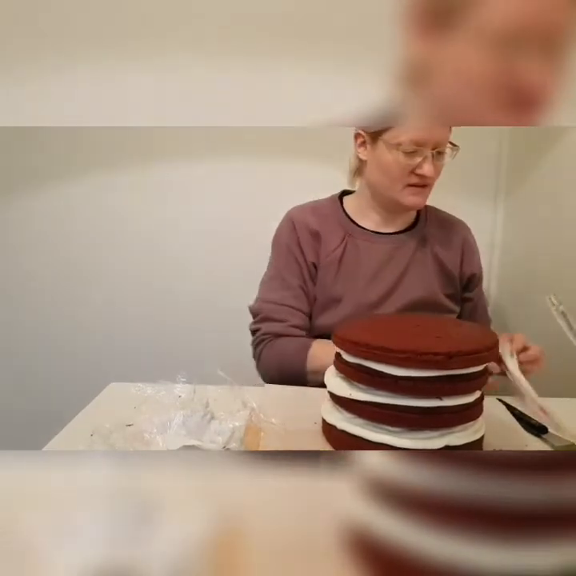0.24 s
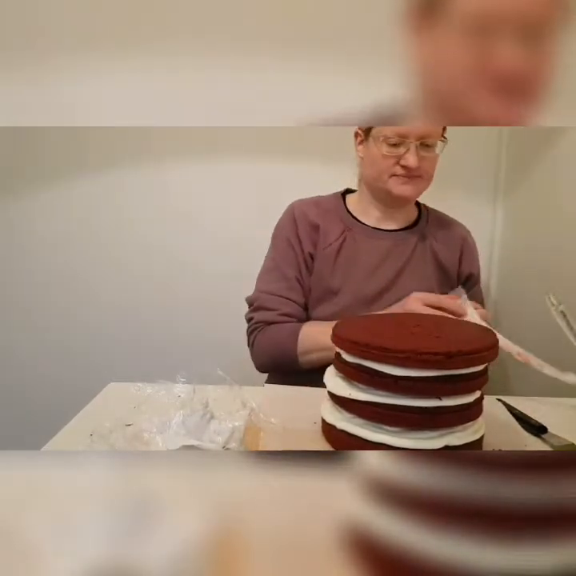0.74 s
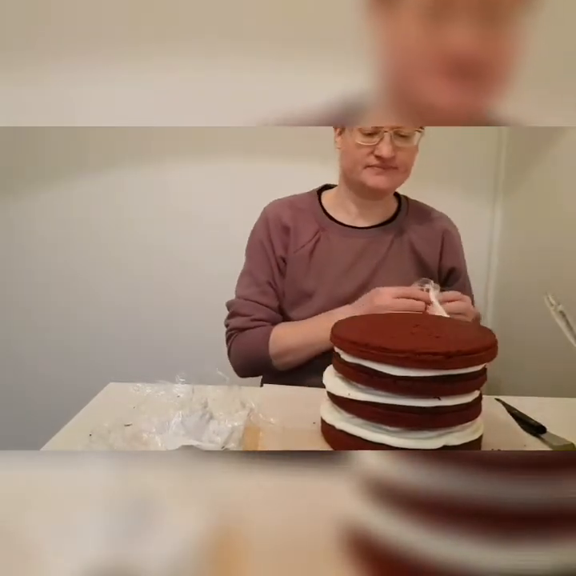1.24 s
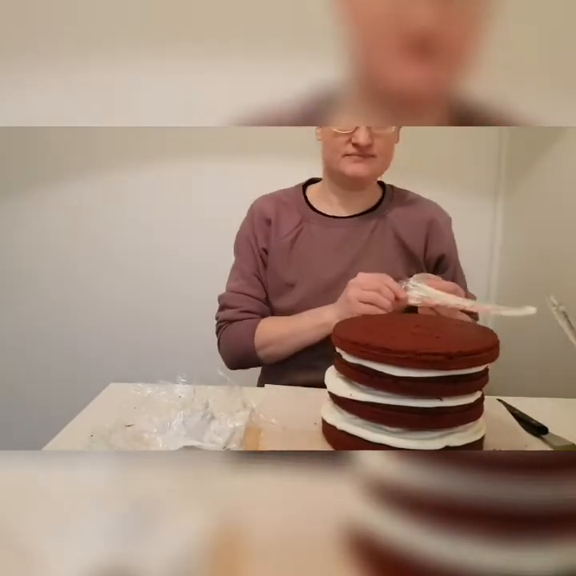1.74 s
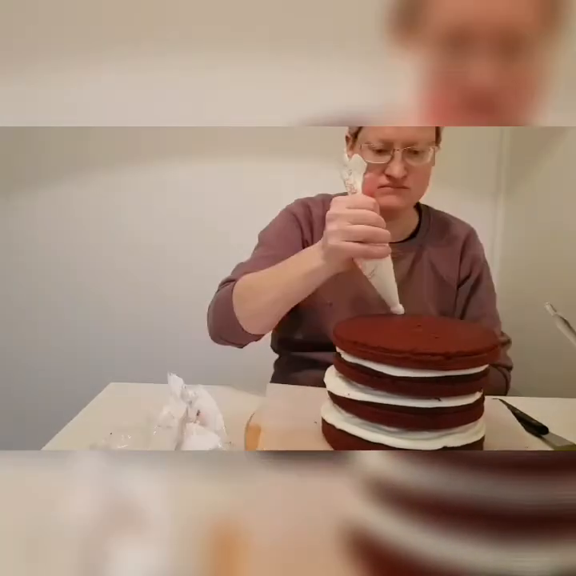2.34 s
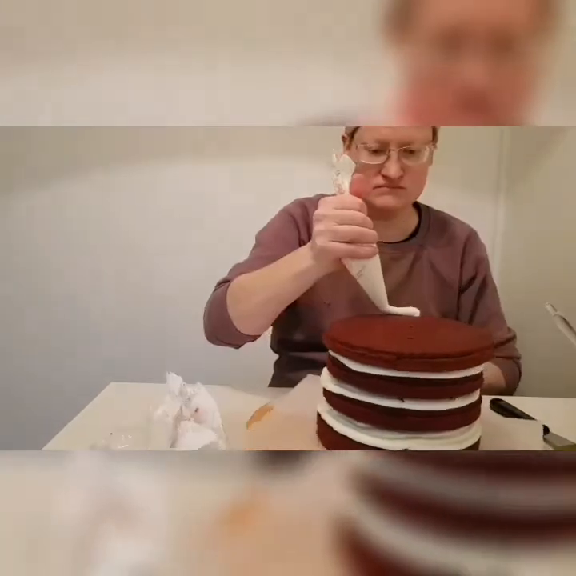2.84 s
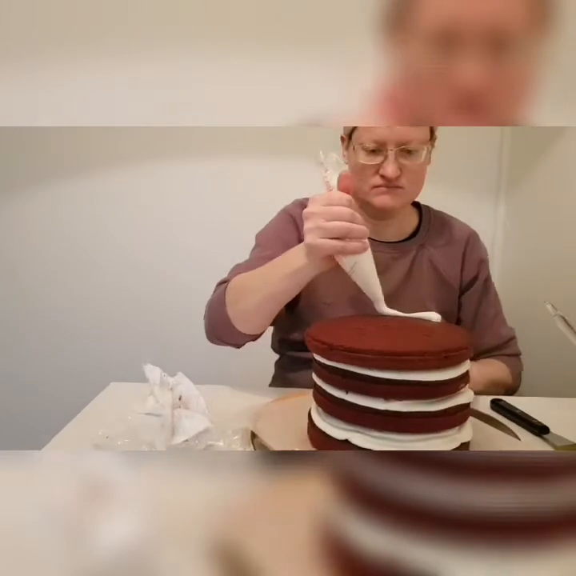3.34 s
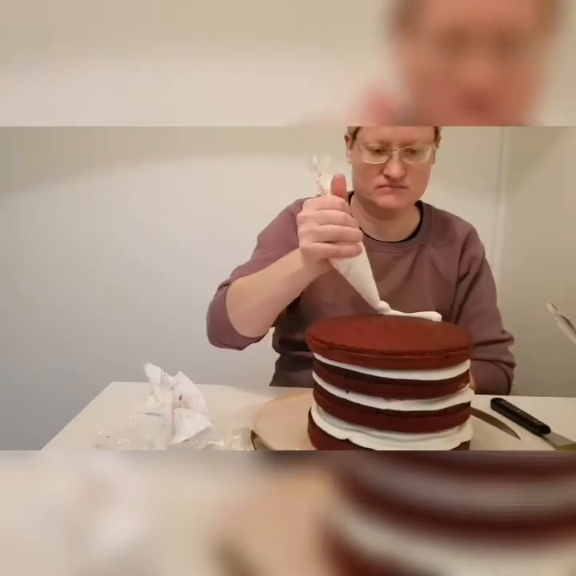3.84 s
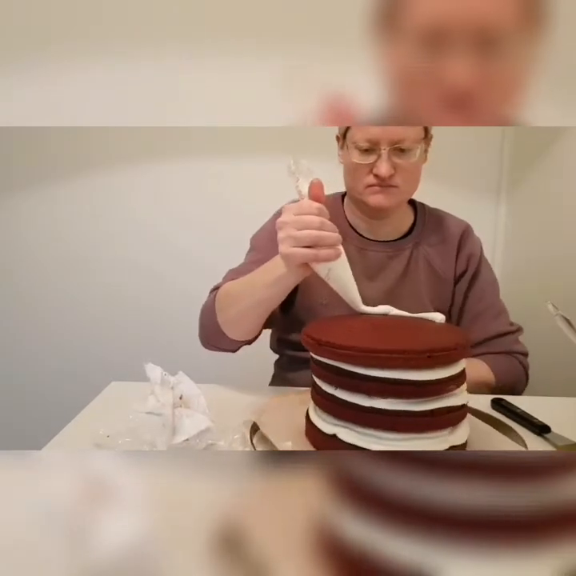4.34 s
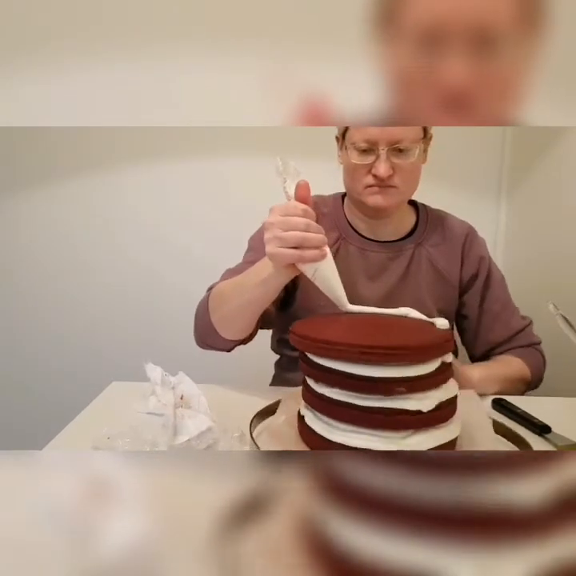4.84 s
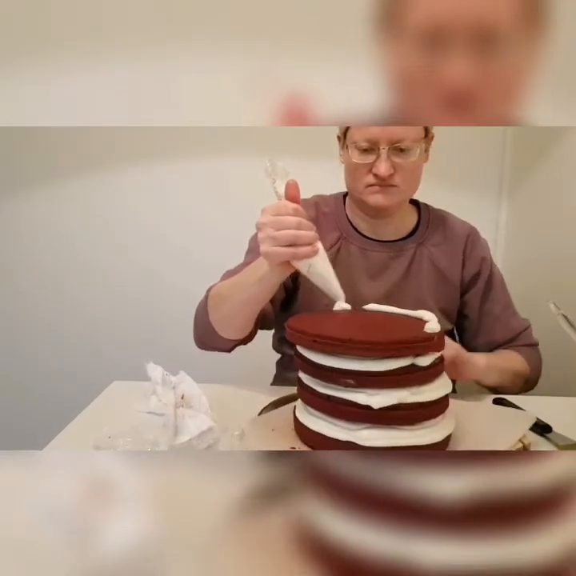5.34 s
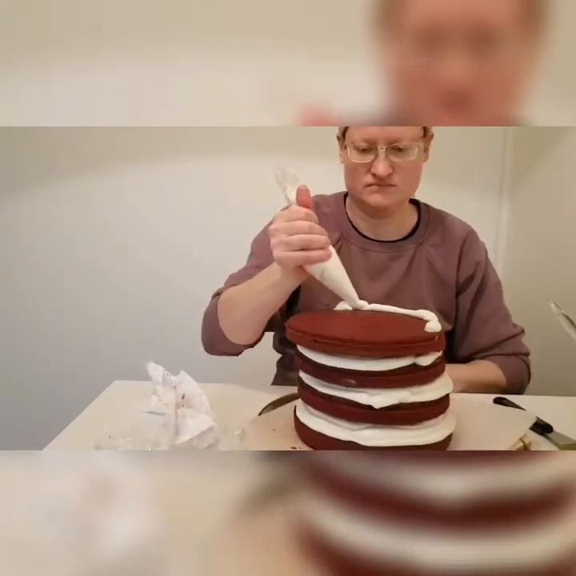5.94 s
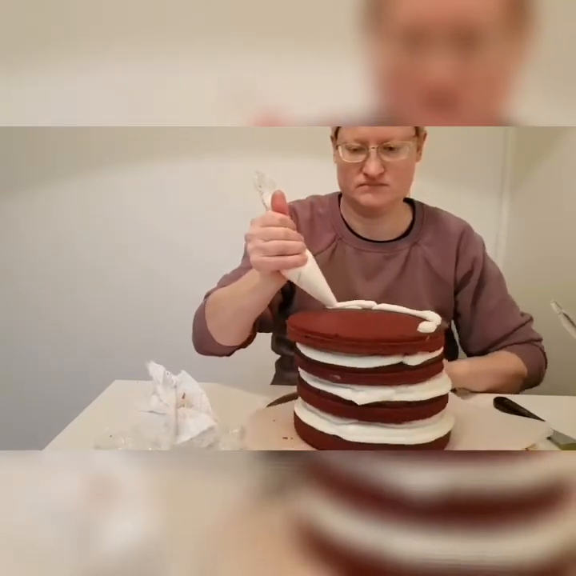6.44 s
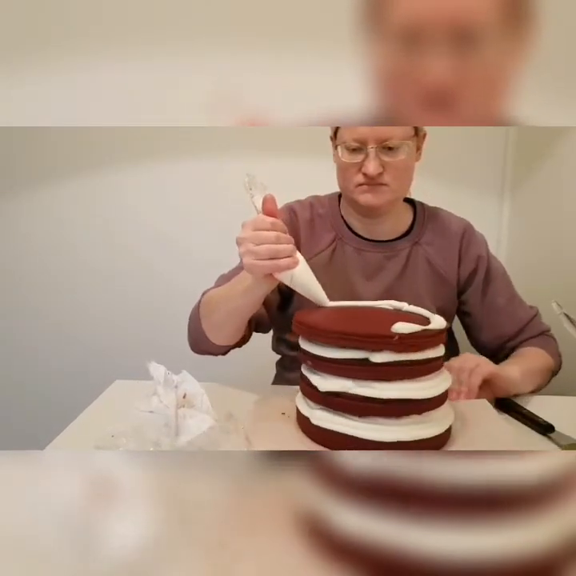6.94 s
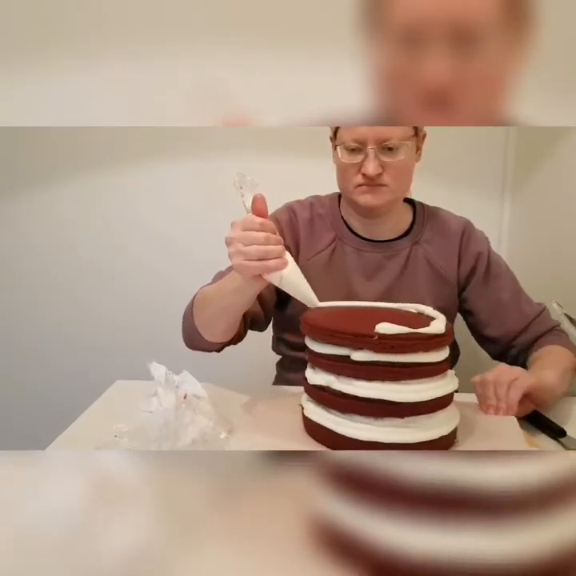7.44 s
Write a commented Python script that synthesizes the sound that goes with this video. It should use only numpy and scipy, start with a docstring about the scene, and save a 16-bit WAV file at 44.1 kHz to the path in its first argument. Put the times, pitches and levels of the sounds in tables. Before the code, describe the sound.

Busy plastic bag crumpling in a bare kitchen swells, cuts off abruptly, then gentle squeezing ticks, sliding scuffs and isolated bright snaps over low hum.

```python
"""A plastic piping bag is twisted and crumpled in a bare kitchen: random micro-clicks, snaps and folds.
After a cut it is squeezed gently in quieter ticks of uneven size, with sharp snaps and squelches of icing.
The cake's board slides on the table: click-excited friction bands; bumps are brief damped knocks.
Decaying noise echoes and standing waves make the room, over a swelling hum, rumble, whine and hiss."""
import sys
import numpy as np
from scipy import signal
from scipy.fft import rfft, irfft, next_fast_len
from scipy.io import wavfile
from scipy.ndimage import uniform_filter1d, map_coordinates

SR = 44100
rng = np.random.default_rng(int(sys.argv[2]) if len(sys.argv) > 2 else 0)


def unload_audio(sound):
    """Save the sound as a 16-bit wav file, at the path given as the first command line argument."""
    columns = np.transpose(np.atleast_2d(sound))
    # keep every value between -1 and 1, then stretch to whole-number steps
    steps = np.round(np.clip(columns, -1, 1) * 32767)
    wavfile.write(sys.argv[1], SR, steps.astype(np.int16))


N = 338864


# All dB columns are relative: layer gains and filters follow.
# Twists of the slack bag. Each row: start in seconds, length in seconds, crackle in dB, flexing sheet in dB.
TWISTS = [(0.035, 0.11, -53.5, -60), (0.075, 0.04, -60, -54), (0.115, 0.074, -46, -57.5),
          (0.22, 0.1, -73, -66.5), (0.41, 0.18, -50.5, -59.5), (0.7, 0.042, -46, -61.5),
          (0.76, 0.34, -49, -54.5), (0.97, 0.069, -43.5, -50.5), (1.09, 0.14, -64, -51),
          (1.39, 0.058, -47.5, -55.5), (1.59, 0.11, -45.5, -53), (1.68, 0.16, -44, -48.5),
          (1.9, 0.094, -52, -57), (2.03, 0.074, -69, -53.5), (2.1, 0.51, -41.5, -44.5),
          (2.38, 0.12, -39.5, -48), (2.47, 0.21, -35.5, -45), (2.56, 0.12, -35.5, -45)]
TWIST_ATTACK_S, TWIST_SAG_DB_PER_S, TWIST_RELEASE_S = 0.053, 5, 0.097
# Ring of the sheet's largest facet. Each row: time in seconds, pitch in Hz.
FACET = [(0.1, 1730), (0.19, 2240), (0.8, 2350), (0.98, 1690), (1.1, 2200), (1.13, 1880), (1.5, 2550),
         (1.68, 2060), (2.4, 2150), (2.44, 1920), (2.62, 2470), (2.66, 2190)]
# Colour of the crackling film. Each row: frequency in Hz, density in dB per Hz.
FILM = [(1200, -62), (2500, -5.5), (4000, 3), (7000, 6), (11000, 1.5), (16000, -2)]
# Colour of the flexing sheet. Each row: frequency in Hz, density in dB per Hz.
SHEET = [(120, -45), (300, -4), (600, 0.5), (1100, -4), (1900, 0), (2800, -0.5), (4500, -14), (9000, -11.5)]


def crumpling(crowding=0.8, sparsest=0.24):
    """Twisting sets off ticks, crowded when hard; the sheet flexes, a facet rings, hands jostle the table."""
    crackling, flexing = film_and_sheet(TWISTS, TWIST_ATTACK_S, TWIST_SAG_DB_PER_S, TWIST_RELEASE_S)
    facet_hz, = curves(FACET)
    density = np.maximum((crackling / crackling.max()) ** crowding, sparsest)
    ticks = crackle(rate_hz=1400 * density, spread_db=1.5, life_s=0.00056, clump_db=6.5)
    clicks = patchy(ticks / np.sqrt(density), depth_db=2.5)  # density leaves the loudness alone
    film = coloured(clicks, FILM)
    sheet = coloured(clicks, SHEET) + amp(-13.5) * gliding(clicks, facet_hz, half_width_hz=160)
    jostle = amp(-14.5) * resonant(noise(), [(51.3, 69, -2), (76, 12, -1)])
    return amp(-9.5) * crackling * film + amp(-5.0) * flexing * (sheet + jostle)


# Squeezes of the taut bag. Each row: start in seconds, length in seconds, crackle in dB, flexing sheet in dB.
SQUEEZES = [(2.64, 0.53, -73, -78.5), (2.81, 0.098, -64, -87), (2.88, 0.089, -57, -64),
            (2.98, 0.36, -65, -69), (3.1, 0.13, -60, -59.5), (3.7, 0.11, -64, -72),
            (3.745, 0.11, -51.5, -57), (3.88, 0.069, -56, -58), (3.955, 0.066, -50.5, -52.5),
            (4.02, 0.014, -47.5, -50.5), (4.2, 0.27, -68.5, -67.5), (4.41, 0.2, -62, -66),
            (4.62, 0.34, -60.5, -58.5), (4.97, 0.41, -84, -56), (6.03, 0.066, -56, -64.5),
            (6.08, 0.051, -60, -53.5), (6.19, 0.14, -65, -54), (6.45, 0.9, -63.5, -74.5),
            (6.76, 0.25, -55, -85), (6.95, 0.17, -74, -59), (7.3, 0.7, -64.5, -86)]
SQUEEZE_ATTACK_S, SQUEEZE_SAG_DB_PER_S, SQUEEZE_RELEASE_S = 0.032, 0.5, 0.044
# Dull colour of a pushed crease. Each row: frequency in Hz, density in dB per Hz.
CREASE = [(200, -12), (500, 1), (1000, 0.5), (1600, 3), (2200, 1), (3200, 0), (6000, -6.5)]


def squeezing():
    """The taut bag gives quiet, loose ticks of uneven size in the fist."""
    crackling, flexing = film_and_sheet(SQUEEZES, SQUEEZE_ATTACK_S, SQUEEZE_SAG_DB_PER_S, SQUEEZE_RELEASE_S)
    ticks = crackle(rate_hz=830, spread_db=3.5, life_s=0.0014, clump_db=5.5)
    film = amp(-11.0) * crackling * coloured(ticks, FILM)
    sheet = amp(-7.5) * flexing * coloured(ticks, CREASE)
    return film + sheet


# Single creases flipping. Each row: start in seconds, level in dB, body in dB re level, centre in Hz,
# bell width in octaves, rise in seconds.
SNAPS = [(0.0563, -56, 1, 8020, 1.7, 0.0011), (0.0658, -54, -14, 7000, 1.2, .001),
         (0.0783, -53, -12, 7000, 1.2, 0.0009), (0.1182, -35.5, 0.5, 6600, 1.4, 0.0024),
         (0.2666, -30, -17, 4500, 1.9, 0.0017), (0.4042, -26.5, -40, 12700, 0.96, 0.0017),
         (0.4469, -34, -21, 8000, 1.1, 0.00064), (0.462, -41, -12, 8000, 1, 0.00082),
         (0.5567, -33.5, -25, 5960, 1.5, .0005), (0.6405, -41, -24, 8000, 1, 0.00055),
         (0.7749, -29.5, -15, 10700, 1.8, 0.0015), (0.7865, -31, -26, 4560, 0.61, 0.0008),
         (0.8465, -27, -14, 8000, 1, 0.0012), (0.9385, -35, -29, 6470, 0.43, 0.0013),
         (0.966, -35, -26, 6500, .6, .001), (0.975, -24.5, -24, 9000, 0.98, 0.0009),
         (1.0865, -26.5, -22, 6800, 0.76, 0.0011), (1.1372, -33.5, -10, 6140, 0.67, 0.00083),
         (1.155, -45, -17, 3500, 0.92, 0.00062), (1.168, -37, -24, 8000, .8, 0.00086),
         (1.1783, -29.5, -23, 6500, 0.8, 0.0011), (1.2227, -33, -24, 9800, 0.73, 0.00052),
         (1.2287, -32.5, -8, 5500, 0.87, 0.00094), (1.2727, -25, -23, 9100, 1.9, 0.0014),
         (1.2992, -28.5, -5.5, 5700, 0.92, 0.0013), (1.3948, -37, -19, 9900, 0.62, 0.00066),
         (1.4077, -27.5, -37, 7700, 0.7, 0.00075), (1.5195, -42, -22, 8000, 1, .0006),
         (1.5927, -30.5, -11, 8300, 0.86, 0.0013), (1.6726, -38, 6, 6940, 1.1, 0.00072),
         (1.6893, -23, -4, 8100, 0.44, 0.0011), (1.7809, -25, -13, 7100, 1.7, 0.00076),
         (1.8014, -26, -8, 6500, 1.8, 0.0013), (1.8364, -23, -12, 6000, 2.6, 0.0011),
         (1.9152, -26.5, -4, 8400, 0.58, 0.0019), (1.9595, -28, -11, 8150, 0.57, .0007),
         (2.0947, -39, -9, 10000, 0.84, .0007), (2.126, -28.5, -1, 11200, 0.6, 0.001),
         (2.1456, -23, -29, 10000, 1, 0.001), (2.2014, -21, -17, 9700, 0.6, .0007),
         (2.2483, -25, -21, 9000, 0.74, 0.0012), (2.3501, -26, -13, 8040, 0.58, 0.0012),
         (2.4219, -35, -20, 9000, 1, 0.00059), (2.4499, -20.5, -11, 8000, 0.62, 0.0019),
         (2.5397, -31, -18, 9000, 1, .0008), (2.9084, -42, -22, 7950, 1, 0.0008),
         (3.1423, -49, -25, 8000, 1.2, .0006), (3.8553, -34, -6.5, 8400, 0.71, 0.00094),
         (4.0635, -41, -18, 11000, 1.4, 0.0011), (4.0887, -31, -26, 5030, 1.4, 0.0009),
         (4.4458, -43, -18, 6030, 0.65, .0007), (4.6259, -38, -20, 12500, 0.78, .0004),
         (4.6283, -36, -25, 13500, 0.38, .0004), (4.6639, -33, -25, 8000, 1.9, 0.00079),
         (4.7796, -27, -38, 9500, 1.6, 0.00059), (5.037, -39, -1, 4950, 1.7, 0.0012),
         (5.1345, -34, -13, 7100, 0.9, 0.00022), (5.1692, -38, -15, 10000, .9, 0.00045),
         (5.2808, -38.5, -1.5, 6130, 0.55, 0.00086), (5.3433, -33, -15, 6030, 0.85, 0.0013),
         (6.0577, -54, -14, 8000, 1.2, .0015), (6.1372, -12.5, -19.5, 12000, 0.9, 0.0013),
         (6.305, -45, -28, 13500, 0.3, .0004), (6.339, -32.5, -25, 11400, 0.95, 0.0006),
         (7.1156, -16.5, -30, 11700, 1.3, 0.0024), (7.4874, -45.5, -24, 11500, 0.26, 0.00045)]


def snaps():
    """A crease flips in a jagged broadband burst that dies within milliseconds."""
    def flip(t, rise_s):
        u = t / rise_s
        shape = u * np.exp(-u)
        phases = np.angle(rfft(shape ** 2 * rng.standard_normal(len(t))))
        click = shape * irfft(np.exp(1j * phases), len(t))
        return click / np.linalg.norm(click)
    return amp(4.5) * bursts(SNAPS, flip, body_db=4.5)


# Whole folds collapsing. Each row: start in seconds, level in dB, body in dB re level, centre in Hz.
FOLDS = [(0.1179, -32.5, -18, 6400), (0.1371, -34.5, -7, 4030), (0.776, -33, -19, 12800),
         (0.848, -35, -12.5, 7900), (0.984, -33, 1.5, 8100), (1.008, -38, -0.5, 9000),
         (1.698, -30.5, 0.5, 8540), (2.1303, -30.5, -32, 11300), (3.82, -44, -16, 7740),
         (4.6624, -45, -5, 6400), (5.045, -56, 0, 3000), (6.087, -42.5, -8, 7800), (6.14, -30, -9.5, 6100),
         (6.2549, -42, -20, 4130), (6.9725, -38.5, -10, 8100), (7.1202, -38, 2, 8700)]


def folds(life_s=0.014, ragged_db=4, octaves=0.88):
    """A fold gives way crease after crease, so its decay is ragged."""
    def run(t):
        steps = np.repeat(rng.standard_normal(len(t)), SR // 1500)[:len(t)]
        return np.exp(-t / life_s) * amp(ragged_db * steps) * rng.standard_normal(len(t))
    return amp(-13.5) * bursts([(*fold, octaves) for fold in FOLDS], run, body_db=3.0)


# Bright colour of a crack. Each row: frequency in Hz, density in dB per Hz.
CRACK = [(1200, -9), (2500, 2), (5000, 3.5), (8000, 2), (12000, 2.5), (16000, -6.5)]


def bursts(events, strike, body_db):
    """Each event plays a new strike as a bright crack around its own pitch and a duller push of the sheet."""
    crack, body, t = np.zeros(N + SR), np.zeros(N + SR), np.arange(SR // 10) / SR
    for s, db, rel_db, centre_hz, octaves, *shape in events:
        start = max(round(s * SR), 0)
        wave = amp(db) * strike(t, *shape)

        def bell(hz):
            return unit(np.exp(-.5 * (np.log2((hz + 1) / centre_hz) / octaves) ** 2))
        crack[start:start + len(t)] += filtered(wave, bell)
        body[start:start + len(t)] += amp(rel_db + body_db) * wave
    return coloured(crack[:N], CRACK) + coloured(body[:N], CREASE)


# Facets popping through. Each row: start in seconds, peak in dB, pitch in Hz.
POPS = [(0.119, -37, 1780), (0.9745, -32, 1490), (0.9848, -30, 1690), (0.992, -40, 910),
        (1.0115, -34, 1380), (1.2734, -38, 1940), (1.2996, -33, 2320), (1.6891, -41, 1720),
        (1.7015, -39, 1580), (1.8014, -31, 2070), (1.8365, -33, 2080), (5.134, -43, 2320),
        (5.169, -53, 1890), (6.142, -32, 2300), (7.116, -46, 730), (7.121, -42, 2130)]
POP_ATTACK_S, POP_CYCLES = 0.00031, 3.6


def pops():
    """A facet of the sheet turns inside out and rings for a few cycles."""
    return amp(-6.5) * ringing(POPS, POP_ATTACK_S, POP_CYCLES)


# Icing at the nozzle. Each row: start in seconds, length in seconds, level in dB, pitch in Hz.
SQUELCHES = [(5.027, 0.03, -60, 2950), (5.1, 0.051, -63, 2500), (5.225, 0.11, -66, 2690),
             (5.31, 0.12, -70, 3320)]
SQUELCH_ATTACK_S, SQUELCH_SAG_DB_PER_S, SQUELCH_RELEASE_S = 0.011, 12, 0.012


def squelching():
    """Tiny air pockets in the icing burst at the nozzle, around one pitch at a time."""
    bubbles = crackle(rate_hz=610, spread_db=1.5, life_s=0.00039, clump_db=-1.0)
    out = np.zeros(N)
    for start, length, db, hz in SQUELCHES:
        flow = strokes([(start, length, db)], SQUELCH_ATTACK_S, SQUELCH_SAG_DB_PER_S, SQUELCH_RELEASE_S)
        out += flow * resonant(bubbles, [(hz, 650, 0)])
    return amp(-3) * out


# Pushes of the board. Each row: start in seconds, length in seconds, friction in dB.
PUSHES = [(2.72, 0.21, -77.5), (2.85, 0.14, -61.5), (2.99, 0.17, -58), (3.17, 0.11, -57.5),
          (3.28, 0.12, -69.5), (4.33, 0.23, -72), (4.55, 0.27, -66), (4.86, 0.28, -64.5),
          (6.74, 0.24, -80.5), (6.92, 0.097, -68), (7.11, 0.22, -67.5), (7.38, 0.13, -76),
          (7.53, 0.19, -68)]
PUSH_ATTACK_S, PUSH_SAG_DB_PER_S, PUSH_RELEASE_S = 0.05, -9, 0.023
# Colour of the scrape. Each row: frequency in Hz, density in dB per Hz.
FRICTION = [(250, -16), (480, 4), (700, 11), (930, 11.5), (1300, 5), (1700, -0.5), (2200, -0.5),
            (2750, -5.5), (3200, -58), (4500, -71), (8000, -58)]
# Board catching and crunching forward. Each row: start in seconds, length in seconds, level in dB.
CRUNCHES = [(2.996, 0.04, -59.5), (3.112, 0.0078, -59), (3.229, 0.017, -51.5)]
CRUNCH_ATTACK_S, CRUNCH_SAG_DB_PER_S, CRUNCH_RELEASE_S = 0.006, 30, 0.015
# Colour of the crunch. Each row: frequency in Hz, density in dB per Hz.
CRUNCH = [(250, -16), (450, 0), (1000, -3), (2000, -10), (2750, -6.5), (3200, -29), (8000, -27)]


def sliding():
    """The cake board scrapes over the table in tiny slips; where it catches, it crunches."""
    pressure = strokes(PUSHES, PUSH_ATTACK_S, PUSH_SAG_DB_PER_S, PUSH_RELEASE_S)
    slips = patchy(crackle(rate_hz=520, spread_db=5.0, life_s=0.0003, clump_db=4.0), depth_db=1.5)
    catching = strokes(CRUNCHES, CRUNCH_ATTACK_S, CRUNCH_SAG_DB_PER_S, CRUNCH_RELEASE_S)
    grit = crackle(rate_hz=1200, spread_db=-3.5, life_s=0.0005, clump_db=0.5)
    scrape = amp(-4.0) * pressure * coloured(slips, FRICTION)
    return scrape + amp(-2.5) * catching * coloured(grit, CRUNCH)


# Board's edge chafing. Each row: start in seconds, length in seconds, level in dB, starting pitch in Hz.
CHAFES = [(3.048, 0.056, -56, 990), (3.288, 0.069, -55.5, 876), (4.475, 0.074, -63, 1230),
          (4.579, 0.157, -61.5, 1290), (4.612, 0.033, -50, 1357), (4.853, 0.15, -58, 1070),
          (4.952, 0.06, -47.5, 1245), (5.069, 0.094, -56, 1199), (7.131, 0.055, -51.5, 1307),
          (7.21, 0.075, -58, 1298)]
CHAFE_ATTACK_S, CHAFE_SAG_DB_PER_S, CHAFE_RELEASE_S = 0.02, -1, 0.011
CHAFE_RISE_HZ_PER_S = 433  # the pitch climbs as a push gathers speed


def chafing(waver_hz=20, stutter_db=-0.5):
    """Friction locks on to a narrow band for a moment and glides upwards, wavering and stuttering."""
    out, t = np.zeros(N), np.arange(N) / SR
    slips = crackle(rate_hz=1200, spread_db=4.5, life_s=0.00065, clump_db=1.0)
    waver = waver_hz * wobble(40)
    stutter = unit(amp(stutter_db * wobble(70)))
    for start, length, db, start_hz in CHAFES:
        grip = strokes([(start, length, db)], CHAFE_ATTACK_S, CHAFE_SAG_DB_PER_S, CHAFE_RELEASE_S)
        pitch_hz = start_hz + waver + CHAFE_RISE_HZ_PER_S * np.clip(t - start, 0, length)
        out += grip * gliding(slips, pitch_hz, half_width_hz=126)
    return amp(-9.5) * stutter * out


# Knocks of hands and full bag on the table. Each row: start in seconds, peak in dB, pitch in Hz.
BUMPS = [(0.163, -43.5, 384), (0.363, -46.5, 400), (0.882, -42, 685), (1.209, -48.5, 50.3),
         (1.229, -43, 340), (2.08, -48, 228), (2.09, -47.5, 122), (2.134, -41, 77.4), (2.139, -46, 550),
         (2.153, -61, 300), (2.171, -60, 253), (2.231, -49, 63), (2.395, -42.5, 68.6), (2.605, -42.5, 556)]
BUMP_ATTACK_S, BUMP_CYCLES, BUMP_PUFF_S = 0.0044, 0.84, 0.033
# Colour of the thud. Each row: frequency in Hz, density in dB per Hz.
THUD = [(30, -3), (60, -10), (100, 0), (200, -16), (400, 10), (700, 0), (1100, -2), (2200, -20)]


def bumps():
    """Soft contact with the table: a short dull knock inside a puff of thudding noise."""
    puffs = strokes([(s, BUMP_ATTACK_S, db) for s, db, _ in BUMPS], BUMP_ATTACK_S, 0, BUMP_PUFF_S)
    thuds = puffs * unit(coloured(noise(), THUD))
    return amp(-3.5) * ringing(BUMPS, BUMP_ATTACK_S, BUMP_CYCLES) + amp(-13.0) * thuds


# Kitchen reverberation. Each row: frequency in Hz, 60 dB decay time in seconds.
WALLS = [(200, 0.8), (1500, 0.47), (4000, 0.61), (8000, 0.4), (15000, 0.37)]
# Standing waves of the kitchen. Each row: frequency in Hz, gain in dB.
ROOM_MODES = [(400, 3), (635, 7), (1580, 9), (1709, 10), (2140, 2), (2349, 12), (2663, 1), (3384, 2)]
MODE_WIDTH_HZ, WALL_DELAY_S = 5.1, .006


def kitchen(x, wet_db, early_db, early_life_s=0.017, near_db=-7, near_life_s=0.0016):
    """After a gap: nearest wall, early reflections and tail, changing as the hands move; standing waves ring."""
    out, hop = np.pad(x, (0, 2 * SR)), SR // 12
    hz, t, z = signal.stft(np.zeros(SR * 3 // 5), SR, nperseg=256)
    decay = amp(-60 * t / along(WALLS, hz)[:, None])
    for start in range(0, N, hop):
        if not x[start:start + hop].any():
            continue
        tail = signal.istft(decay * np.exp(2j * np.pi * rng.random(z.shape)), nperseg=256)[1]
        echo_t = np.arange(len(tail)) / SR
        early = rng.laplace(size=len(tail)) * np.exp(-echo_t / early_life_s)
        near = rng.laplace(size=len(tail)) * np.exp(-echo_t / near_life_s)
        parts = [(wet_db, tail), (early_db, early), (near_db, near)]
        echo = sum(amp(db) * part / np.linalg.norm(part) for db, part in parts)
        wet = signal.fftconvolve(x[start:start + hop], echo)
        out[start + round(WALL_DELAY_S * SR):][:len(wet)] += wet

    def standing(f):
        damping = 1j * f * MODE_WIDTH_HZ
        return sum(amp(db) * damping / (c * c - f * f + damping) for c, db in ROOM_MODES)
    return out[:N] + filtered(x, standing)


# Swells of the hum. Each row: start in seconds, length in seconds, level in dB.
SWELLS = [(0.09, 0.025, -53), (0.46, 0.29, -55.5), (0.82, 0.17, -50), (1.03, 0.2, -57.5),
          (1.21, 0.045, -49), (1.45, 0.21, -59), (1.91, 0.37, -58.5), (2.25, 0.1, -44),
          (2.45, 0.083, -42.5), (2.66, 0.26, -52.5), (3.04, 0.24, -56), (3.95, 0.78, -59.5),
          (4.43, 0.55, -51), (5.19, 0.2, -52), (5.67, 0.18, -48.5), (6.1, 0.91, -74.5), (7.01, 0.41, -53.5),
          (7.57, 0.097, -60.5)]
SWELL_ATTACK_S, SWELL_SAG_DB_PER_S, SWELL_RELEASE_S = 0.031, -3, 0.076
# Hum resonances. Each row: frequency in Hz, half-width in Hz, gain in dB.
DRONE = [(115.8, 6.6, -0.5), (129.9, 6.8, 3)]
# Rumble level. Each row: time in seconds, level in dB.
RUMBLE_LEVEL = [(0.0, -62), (0.15, -60.5), (0.6, -61.5), (1.28, -60.5), (1.5, -60), (1.75, -61.5),
                (2.07, -59), (2.14, -50.5), (2.65, -59), (2.74, -62), (3.25, -59.5), (3.55, -71.5),
                (3.9, -67), (4.2, -60.5), (5.62, -65.5), (6.2, -61.5), (6.48, -76), (7.04, -58.5),
                (7.68, -60)]
# Rumble colour. Each row: frequency in Hz, density in dB per Hz.
RUMBLE = [(15, -20), (28, -8.5), (50, -5), (75, -15), (95, -10), (123, -1.5), (147, -10.5), (184, -10.5),
          (303, -10), (334, -16), (390, -13), (480, -30.5), (700, -41), (910, -97), (1540, -120)]
# Boom resonances in the rumble. Each row: frequency in Hz, half-width in Hz, gain in dB.
BOOM = [(243.7, 18.5, -5.5), (340.3, 16, 0)]
# Faint steady tones. Each row: frequency in Hz, half-width in Hz, gain in dB.
TONES = [(48, 6.7, -15), (195.9, 4.7, -8), (241.8, 2.9, -5)]
# Hiss colour. Each row: frequency in Hz, density in dB per Hz.
HISS = [(300, -19), (500, -4), (700, -14.5), (3000, -23.5), (5000, -22.5), (8000, -25.5), (11000, -16),
        (15000, -20), (16000, -8)]
WHINE_HZ, WHINE_DB, HISS_DB = 4700, -90, -69


def background():
    """Resonated and coloured noise: a beating, swelling hum, booming rumble, faint tones, whine and hiss."""
    swell = strokes(SWELLS, SWELL_ATTACK_S, SWELL_SAG_DB_PER_S, SWELL_RELEASE_S)
    rumble_db, = curves(RUMBLE_LEVEL)
    drone = signal.hilbert(resonant(noise(), DRONE), next_fast_len(N))[:N]
    hum = amp(-3.0) * swell * unit(drone.real / (np.abs(drone) + 1))  # beats, but without large peaks
    boom = amp(-4.5) * resonant(noise(), BOOM)
    rumble = amp(rumble_db - 1.5) * (unit(coloured(noise(), RUMBLE)) + boom)
    whine = amp(WHINE_DB) * resonant(noise(), [(WHINE_HZ, 90, 0)])
    tones = amp(-71.5) * resonant(noise(), TONES)
    hiss = amp(HISS_DB) * unit(coloured(noise(), HISS))
    return hum + rumble + whine + tones + hiss


def crackle(rate_hz, spread_db, life_s, clump_db):
    """Micro-clicks of rms 1: decaying noise bursts of random size, arriving in small avalanches."""
    knots = np.arange(N) / SR * 110
    count = int(knots[-1]) + 2
    avalanche = amp(clump_db * np.interp(knots, np.arange(count), rng.standard_normal(count)))
    size = amp(spread_db * np.minimum(rng.exponential(size=N), 3.5))
    power = (rng.random(N) < rate_hz * avalanche / SR) * size ** 2
    power = signal.lfilter([1], [1, -np.exp(-2 / (life_s * SR))], power)
    return unit(np.sqrt(power) * noise())


def patchy(x, depth_db):
    """Colour that shifts from moment to moment, as facets of the sheet change size."""
    z = signal.stft(x, nperseg=512)[2]
    field = uniform_filter1d(rng.standard_normal(z.shape), size=6, axis=0)
    field = uniform_filter1d(field, size=7, axis=1)
    return unit(signal.istft(z * amp(depth_db * unit(field)), nperseg=512)[1][:N])


def gliding(x, pitch_hz, half_width_hz):
    """A narrow band of rms 1, excited by x, whose centre follows a pitch curve."""
    carrier = np.sin(2 * np.pi * np.cumsum(pitch_hz) / SR)
    return unit(resonant(x, [(0, half_width_hz, 0)]) * carrier)


def strokes(rows, attack_s, sag_db_per_s, release_s):
    """Movement gains: each builds up, sags (negative sag: grows) and dies away; they add in power."""
    power = np.zeros(N)
    for start, length, db in rows:
        first = max(round(start * SR), 0)
        t = np.arange(min(N - first, 2 * SR)) / SR
        rise = np.sin(np.pi / 2 * np.minimum(t / attack_s, 1)) ** 2
        release = np.exp(-np.maximum(t - length, 0) / release_s)
        power[first:first + len(t)] += (rise * amp(db - sag_db_per_s * t) * release) ** 2
    return np.sqrt(power)


def film_and_sheet(grips, *shape):
    """Each grip drives the crackle and the flexing sheet with the same envelope."""
    return (strokes([(s, length, db) for s, length, db, _ in grips], *shape),
            strokes([(s, length, db) for s, length, _, db in grips], *shape))


def ringing(rows, attack_s, cycles):
    """Each (s, peak dB, Hz) blow starts a vibration that dies within a few cycles."""
    out, t = np.zeros(N + SR), np.arange(SR // 8) / SR
    for s, db, hz in rows:
        shape = (1 - np.exp(-t / attack_s)) * np.exp(-t * hz / cycles)
        out[round(s * SR):][:len(t)] += amp(db) * shape / shape.max() * np.sin(2 * np.pi * hz * t)
    return out[:N]


def wobble(rate_hz):
    """A smooth random curve, rate_hz knots a second."""
    return map_coordinates(rng.standard_normal(int(N * rate_hz / SR) + 4), [np.arange(N) * rate_hz / SR])


def amp(db):
    """Decibels to gain."""
    return 10 ** (np.asarray(db) / 20)


def unit(x):
    """Scale to rms 1."""
    return x / np.sqrt(np.mean(x ** 2) + 1e-20)


def along(points, hz):
    """(Hz, value) points read on a log axis."""
    f, v = np.transpose(points)
    return np.interp(np.log(hz + 1), np.log(f + 1), v)


def curves(rows):
    """One value per sample for each column after the time."""
    s, *cols = np.transpose(rows)
    return [np.interp(np.arange(N) / SR, s, c) for c in cols]


def filtered(x, response):
    """x times a response of frequency."""
    m = next_fast_len(len(x) + 8192)
    return irfft(rfft(x, m) * response(np.fft.rfftfreq(m, 1 / SR)), m)[:len(x)]


def coloured(x, spectrum):
    """Shape x by a spectrum, keeping the power of a white input."""
    return filtered(x, lambda hz: unit(amp(along(spectrum, hz))))


def resonant(x, modes):
    """x through steep-sided resonances, 12 dB down at the half-width, at rms 1."""
    def response(f):
        return sum(amp(db) / (1 + ((f - hz) / half_width_hz) ** 2) ** 2 for hz, half_width_hz, db in modes)
    return unit(filtered(x, response))


def noise():
    """White noise for the whole scene."""
    return rng.standard_normal(N)


CUT_S = 2.667  # between crumpling and piping


def scene():
    """Two scenes, one short fade; the first's reverberation ends with it; later snaps are drier than the sliding."""
    first = np.clip((CUT_S - np.arange(N) / SR) / 0.022 + .5, 0, 1)
    second = 1 - first
    flips, collapses = snaps() + pops(), folds()
    preparing = kitchen(first * (crumpling() + bumps() + flips + collapses), wet_db=1.1, early_db=-9)
    handling = squeezing() + squelching() + sliding() + chafing() + collapses
    piping = kitchen(second * handling, wet_db=-0.1, early_db=-1.0)
    snapping = kitchen(second * flips, wet_db=0.0, early_db=-3)
    return (first * preparing + piping + snapping + background())[None]


TOP_HZ = 15850


def record(dry, low_hz=38):
    """Roll off the deepest bass and keep nothing above the band limit."""
    return filtered(dry[0], lambda hz: (hz < TOP_HZ) / (1 + (low_hz / (hz + 1)) ** 6))[None]


dry = scene()
out = record(dry)
unload_audio(out)
```